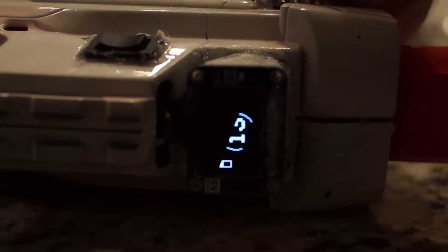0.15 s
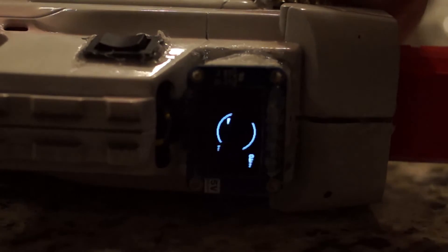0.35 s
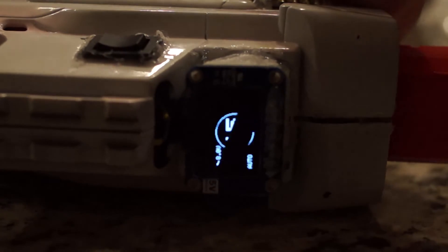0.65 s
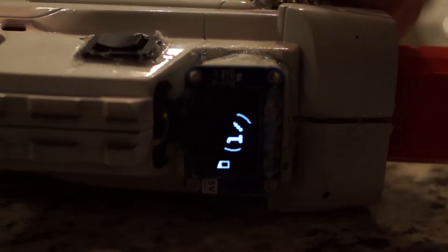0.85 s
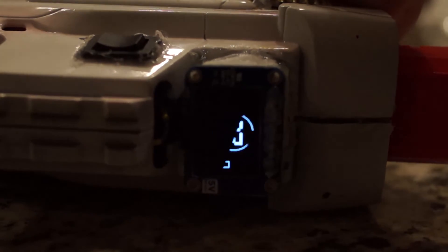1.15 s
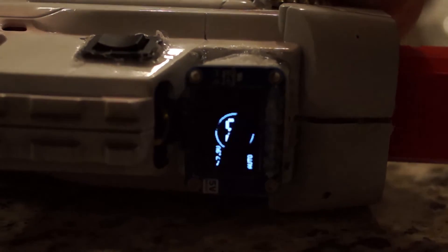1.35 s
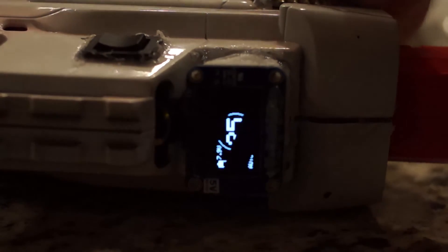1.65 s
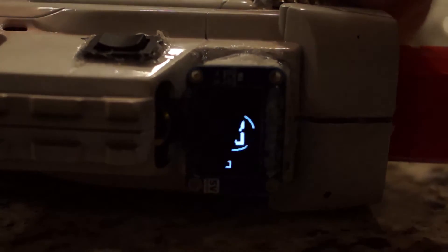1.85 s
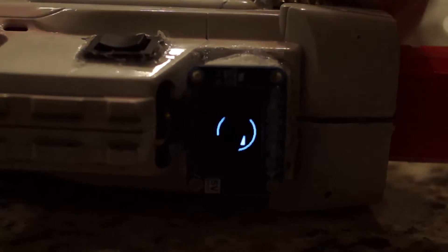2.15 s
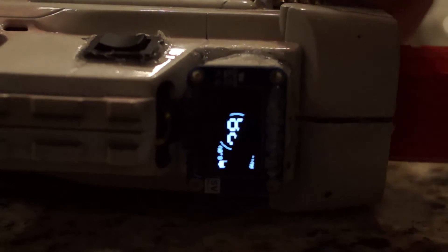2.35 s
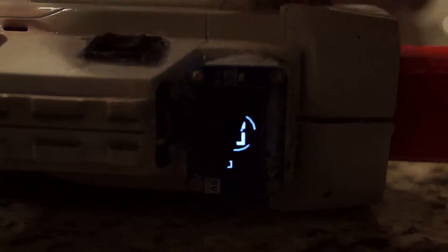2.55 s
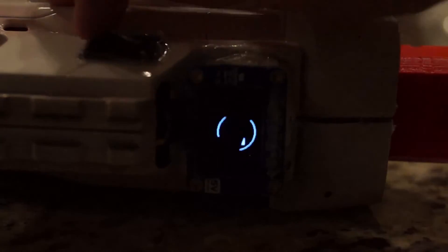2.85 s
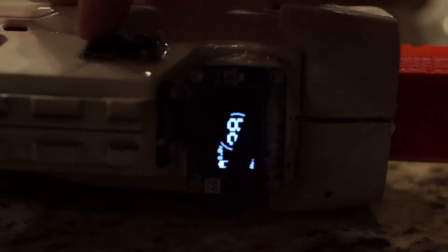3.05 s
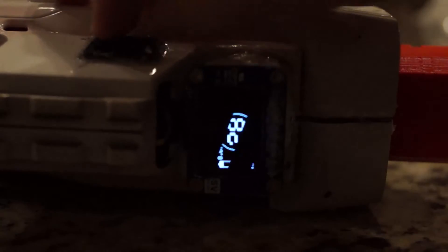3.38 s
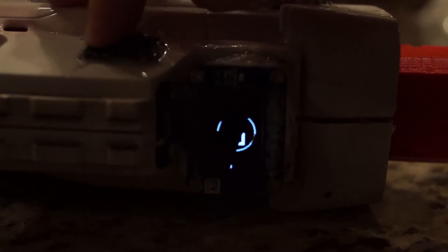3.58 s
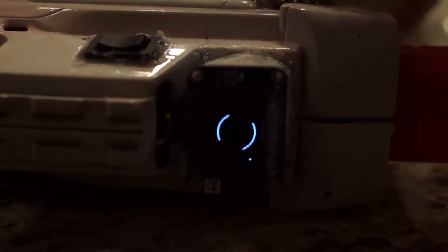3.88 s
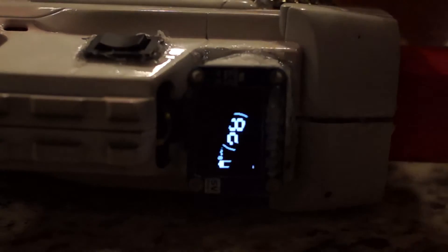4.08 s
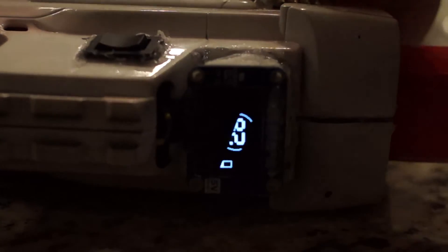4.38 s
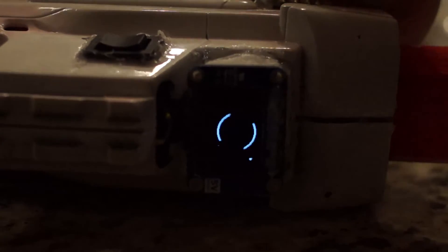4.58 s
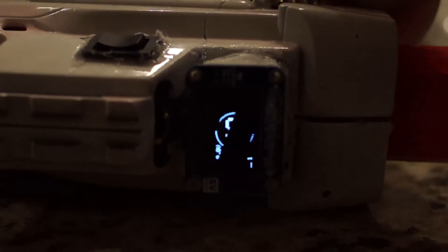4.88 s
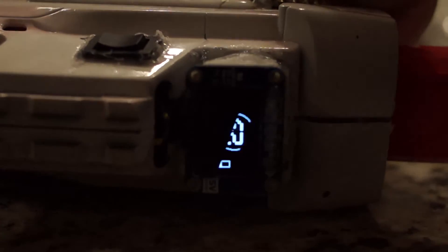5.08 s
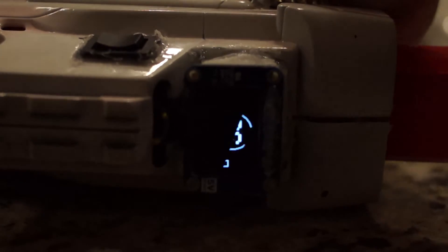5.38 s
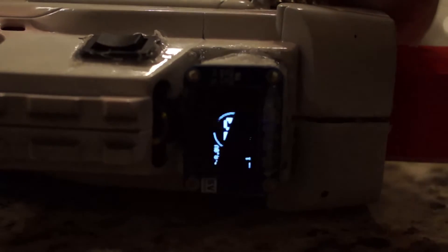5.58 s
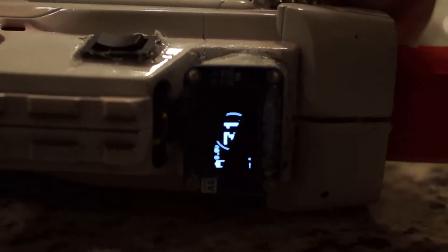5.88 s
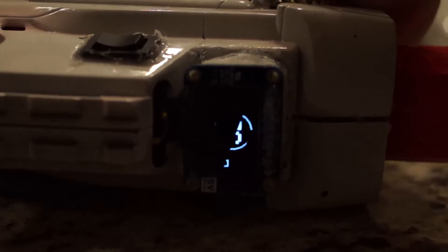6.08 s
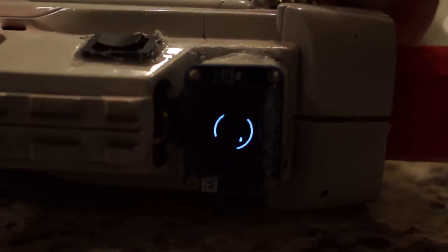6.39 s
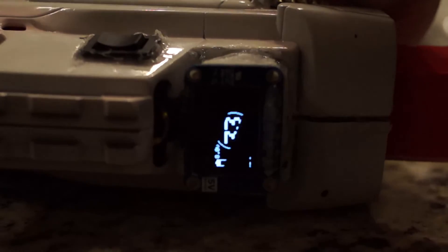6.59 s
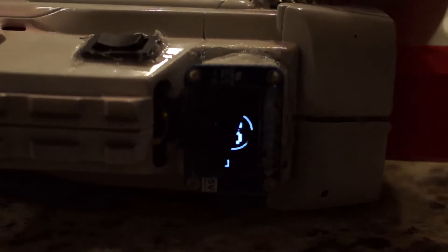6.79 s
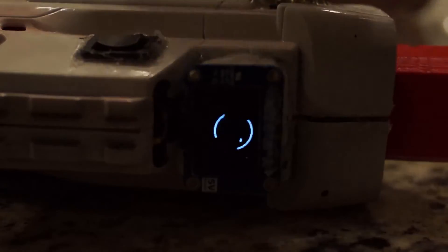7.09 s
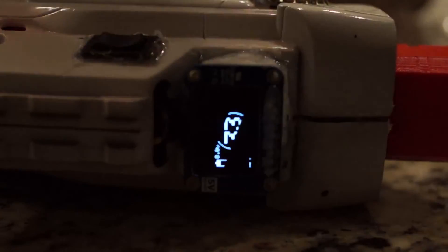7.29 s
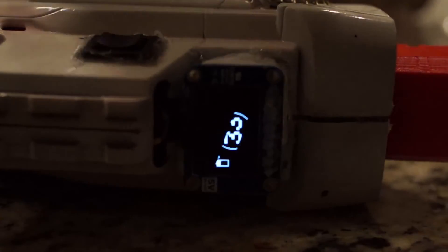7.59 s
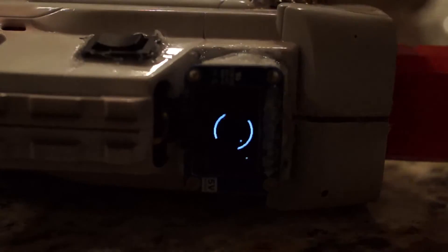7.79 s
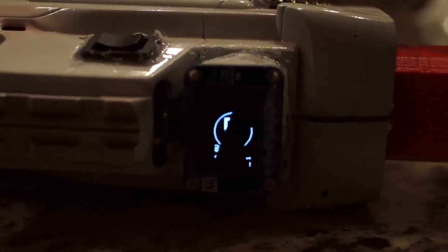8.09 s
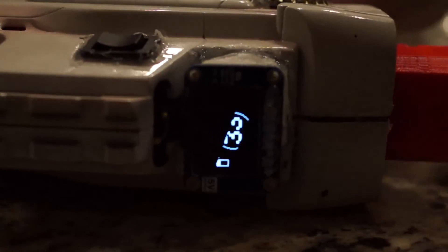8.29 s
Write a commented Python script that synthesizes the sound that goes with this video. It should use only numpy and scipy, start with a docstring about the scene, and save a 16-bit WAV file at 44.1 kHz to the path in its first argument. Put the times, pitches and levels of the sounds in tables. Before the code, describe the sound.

Close, rattling motor bursts from a plastic toy blaster, followed by handling clicks and five short, evenly spaced whirring shots.

```python
"""Toy dart blaster, fired empty

Close up in a small hard room: two bursts, then five single shots. The motor whines up to speed and
cranks a pusher through a gearbox; every stroke rattles the hollow plastic shell. The trigger creaks
and trips its switch before each run, buttons and fingers click, and the room hums faintly."""
import sys
import numpy as np
from scipy import signal
from scipy.fft import rfft, irfft, next_fast_len
from scipy.io import wavfile
from scipy.ndimage import map_coordinates

SR = 44100
rng = np.random.default_rng(int(sys.argv[2]) if len(sys.argv) > 2 else 0)


def inscribe(sig):
    """Save sig as 16-bit PCM at rate SR to the path in sys.argv[1].

    A 1-D sig is mono; a 2-D sig holds one channel per row.
    Samples are clipped to [-1, 1] before scaling.
    """
    pcm = np.round(np.clip(np.atleast_2d(sig).T, -1, 1) * 32767)
    wavfile.write(sys.argv[1], SR, pcm.astype(np.int16))


N = 372204
TIME = np.arange(N) / SR
FFT_SIZE = 2 * next_fast_len(N // 2 + SR // 2)
HZ = np.fft.rfftfreq(FFT_SIZE, 1 / SR)

# bursts and shots: (start [s], stop [s], full motor speed [rev/s], level [dB])
MOTOR_RUNS = [(.458, 1.669, 591, -1), (2.082, 2.384, 595, -0.5), (4.779, 4.883, 592, -0.5),
              (5.185, 5.284, 594, -0.5), (5.55, 5.652, 591, -1), (5.921, 6.021, 590, -0.5),
              (6.292, 6.395, 591, -0.5)]
# hits within one pusher stroke: (position [crank turns], thud [dB], clack [dB])
STROKE_HITS = [(0, -32, -15), (.075, -21, -23.5), (.125, -24, -24), (.19, -34.5, -28), (.275, -20, -21),
               (.33, -20, -27.5), (.38, -18.5, -30), (0.521, -26.5, -17), (0.584, -20, -22),
               (.655, -17.5, -33.5), (0.719, -27.5, -28.5), (.8, -24.5, -33)]
# partials of the whine: (multiple of the shaft speed, level [dB])
WHINE_PARTIALS = [(1, -29), (3, -33), (6, -27), (7, -47), (12, -55), (14, -43)]
# broad colour of the plastic shell: (frequency [Hz], gain [dB])
SHELL_EQ = [(30, -58), (120, -37), (200, -28), (420, -16), (620, -4), (1000, 0.16), (1750, 1.5),
            (2100, -6.5), (3000, -7.5), (4200, -8), (5500, -12), (7800, -16.5), (9000, -20), (11000, -22)]
# its resonances: (centre [Hz], width [Hz], boost [dB])
SHELL_PEAKS = [(527, 14, 4), (689, 63, 6), (797, 38, 5), (986, 105, 6), (1183, 76, 5.5), (1269, 22, 3.5),
               (1387, 7, 3.5), (1510, 64, 7), (1777, 12, 5), (2423, 220, 3.5), (2750, 160, 3),
               (2840, 270, 2.5), (3444, 130, 6.5), (4180, 130, 3), (8200, 160, 2)]
# the whole shell rocking on the counter: (frequency [Hz], level [dB], t60 before damping [s])
KNOCK_MODES = [(343, 2, 0.07), (565, -7, 0.19), (690, -4, 0.56), (727, -8.5, 0.35)]
# trigger pulls: (touch [s], switch trips [s], end [s], level [dB], touch accent [dB], slip accent [dB])
TRIGGER_PULLS = [(0.3113, .347, .407, -5.5, 5, 0), (1.953, 1.978, 2.042, -1.5, 0, 1),
                 (4.678, 4.703, 4.741, 2.5, -4, -2), (5.091, 5.118, 5.149, 1, -8, 0),
                 (5.441, 5.462, 5.509, 0, 3.5, -1.5), (5.8359, 5.859, 5.897, -1, 4, 1.5),
                 (6.195, 6.222, 6.266, -1.5, 7.5, 1)]
# each pull takes up slack, slips, trips the switch, slips again and bottoms out: (travel [0 touch,
# 1 switch, 2 end], knock [dB], body [dB], snap [dB], tick [dB], base t60 [s], ring [Hz])
TRIGGER_HITS = [(0, -50, -36, -45, -49, 0.038, 1620), (0.599, -62, -38, -48, -56, 0.047, 1725),
                (1, -61.5, -44, -41, -43, 0.045, 2640), (1.26, -52, -34, -45, -53, 0.041, 1510),
                (2, -56, -37, -46, -55, .038, 1780)]
# buttons and fingers: (time [s], snap [dB], body re snap [dB], tick re snap [dB], base t60 [s], ring [Hz])
FINGER_CLICKS = [(3.192, -54.5, -2.5, -18, 0.073, 1840), (3.344, -59, 8, -14, .05, 1830),
                 (3.401, -52, 8.5, -15, .036, 1680), (3.5856, -30, -11, -6.5, .021, 1760),
                 (3.7153, -34.5, -6, -2.5, .027, 1620), (4.1755, -34, 8.5, -6.5, 0.027, 1140),
                 (4.2037, -38, 8.5, -5, 0.083, 840), (8.128, -42.5, -8, -12, 0.07, 1680),
                 (8.2115, -29.5, -6, -9, 0.0084, 3300), (8.3208, -36, -3, -9, 0.02, 2210),
                 (8.397, -28.5, -8.5, -7.5, .03, 2070)]
# a click's body, snap and tick: (low edge [Hz], high edge [Hz], multiple of the base t60)
CLICK_BANDS = [(760, 1510, 1.33), (1540, 4750, 0.87), (4940, 9600, 0.92)]
# the grip shifts and the shell bumps the counter: (time [s], snap [dB], ring [Hz])
COUNTER_BUMPS = [(7.4248, -36.5, 784), (7.5686, -40.5, 2210), (7.5986, -49.5, 3030), (7.634, -44, 2740),
                 (7.655, -42.5, 2150)]
# a bump's layers, added to its level: (knock [dB], body [dB], snap [dB], tick [dB])
BUMP_MIX = (5, -2, 1, -15)
# the top switch springs back: (time [s], level [dB])
SWITCH_RELEASES = [(3.585, -54), (3.7125, -57)]
# its ringing metal: (frequency [Hz], level [dB], t60 [s])
SPRING_MODES = [(1770, -5, .1), (2875, -5, .17), (3470, -9, 0.15), (4100, -9, .2), (4745, -3, 0.12),
                (6040, -9, .2), (7700, -10, .14)]
# a hand slides over the plastic: (centre [s], half length [s], level [dB])
HAND_SLIDES = [(3.933, 0.071, -67), (7.728, 0.14, -60.5), (7.958, 0.045, -70), (8.3, 0.25, -59)]
# reverb decay: (frequency [Hz], t60 [s])
ROOM_DECAY = [(150, 0.66), (800, 0.39), (2000, 0.42), (5500, 0.41), (11000, 0.32)]
# colour of the room tone: (frequency [Hz], gain [dB])
AIR_EQ = [(15, -33), (25, -19.5), (59, -5), (92, -9.5), (107, -6), (160, -5.5), (192, -6.5), (241, -3.5),
          (401, -5.5), (492, -6.5), (840, -13), (1110, -15), (1360, -16), (1590, -20), (11000, -37.5),
          (14300, -76), (22000, -120)]
# appliance hum: (frequency [Hz], level [dB])
HUM_TONES = [(119.8, -63.5), (150.7, -65.5), (170, -62), (250, -69), (299, -70)]
# stereo width, opening towards the treble: (frequency [Hz], side gain [dB])
SIDE_EQ = [(100, -23.5), (300, -15.5), (700, -14.5), (1500, -6), (4000, -5), (10000, -3)]
# colour mismatch of the microphones: (frequency [Hz], left minus right [dB])
MIC_BALANCE = [(60, 1.5), (130, -0.5), (270, -0.5), (570, 2.5), (1210, 0.5), (2560, 0.5), (5430, -1.0),
               (11500, 0.5)]


def drive(spin_up_s=.022, brake_s=.018, strain_db=1, turns_per_stroke=60, rest_turn=.015):
    """The motor spins up and is braked: shaft speed [rev/s], crank position [turns] and force."""
    speed, crank, force = np.zeros((3, N))
    for start, stop, full_speed, db in MOTOR_RUNS:
        on = (TIME >= start) & (TIME < stop + .1)
        t = TIME[on]
        rise = 1 - np.exp(-(t - start) / spin_up_s)
        share = rise * np.exp(-np.maximum(t - stop, 0) / brake_s)
        speed[on] = full_speed * share
        crank[on] = rest_turn + np.cumsum(speed[on]) / SR / turns_per_stroke
        force[on] = amp(db + strain_db * (.5 - rise)) * share ** .5
    return speed, crank, force


def pusher_rattle(speed, crank, force, scatter_db=1.38, grind_db=-30, teeth_db=-35, crossover_hz=2200):
    """Loose parts collide at set crank angles and chatter in the shell; the gears grind in between."""
    thuds, clacks = np.zeros((2, N))
    turning = (crank[:-1] > 0) & (crank[1:] > 0)
    for turn, thud_db, clack_db in STROKE_HITS:
        hits = np.flatnonzero((np.diff(np.floor(crank - turn)) > 0) & turning)
        strength = force[hits, None] * amp(scatter_db * rng.standard_normal((len(hits), 2)))
        thuds[hits] += amp(thud_db) * strength[:, 0]
        clacks[hits] += amp(clack_db) * strength[:, 1]
    # the gears are loudest while they accelerate the pusher
    acceleration = np.maximum(np.gradient(speed), 0)
    strain = force * (acceleration / acceleration.max()) ** .5
    low = decay(thuds, t60=.043) + amp(grind_db) * force + amp(-22) * strain
    high = decay(clacks, t60=.05) + amp(teeth_db) * force + amp(-24) * strain * speed / speed.max()
    low *= chatter(rate=3000, smooth=.81)
    high *= chatter(rate=4000, smooth=.94)
    shell = shell_colour()
    low_share = 1 / (1 + (HZ / crossover_hz) ** 4)
    low_eq = causal(unit(shell * low_share ** .5))
    high_eq = causal(unit(shell * (1 - low_share) ** .5))
    return filtered(low, low_eq) + filtered(high, high_eq)


def shell_colour():
    """The hollow shell's gain curve: a broad EQ with cavity and panel resonances on top."""
    peaks_db = sum(db / (1 + (2 * (HZ - hz) / width) ** 2) for hz, width, db in SHELL_PEAKS)
    return amp(along(SHELL_EQ) + peaks_db)


def motor_whine(speed, crank, force, sag=.00095, flutter_db=1.1, commutator_multiple=3, surge_db=19.5,
                panel_hz=1620, panel_half_width_hz=95, panel_db=9):
    """Shaft imbalance and commutator tones radiate from the shell, sweeping a loose panel's resonance."""
    turns = np.cumsum(speed * (1 + sag * np.sin(2 * np.pi * crank) + .0007 * wobble(40))) / SR
    current = np.tanh((1 - speed / speed.max()) / .2)
    tones = np.zeros(N)
    for multiple, db in WHINE_PARTIALS:
        hz = multiple * speed
        boost_db = panel_db / (1 + ((hz - panel_hz) / panel_half_width_hz) ** 2)
        if multiple == commutator_multiple:  # swells with the current drawn below full speed
            boost_db += surge_db * current
        shell_db = np.minimum(along(SHELL_EQ, hz) - along(SHELL_EQ, hz.max()), 0)
        level = amp(db + boost_db + shell_db - flutter_db * wobble(45))
        tones += level * np.sin(2 * np.pi * multiple * turns)
    return tones * force * (speed / speed.max()) ** 2


def click_cues(finger_knock_db=-17, bump_t60=.074):
    """Trigger, finger and counter hits: (time [s], knock, body, snap, tick [dB], t60 [s], ring [Hz])."""
    cues = []
    for *times, db, touch_db, slip_db in TRIGGER_PULLS:
        accents_db = db + np.array([touch_db, slip_db, 0, slip_db, slip_db])
        for (travel, *levels, t60, ring_hz), accent_db in zip(TRIGGER_HITS, accents_db):
            start = np.interp(travel, [0, 1, 2], times)
            cues.append((start, *np.add(levels, accent_db), t60, ring_hz))
    for start, db, body_db, tick_db, t60, ring_hz in FINGER_CLICKS:
        cues.append((start, db + finger_knock_db, db + body_db, db, db + tick_db, t60, ring_hz))
    for start, db, ring_hz in COUNTER_BUMPS:
        cues.append((start, *np.add(BUMP_MIX, db), bump_t60, ring_hz))
    return cues


def plastic_clicks(trim_db=-.5, knock_trim_db=-3, ring_db=-2, attack_s=.00018):
    """Each contact is a dry snap in three noise bands, a brief ring and a hollow knock of the shell."""
    t = np.arange(SR // 5) / SR
    tracks, rings = np.zeros((len(CLICK_BANDS), N + SR)), np.zeros(N + SR)
    t60_scales = np.array(CLICK_BANDS)[:, 2:]
    for start, knock_db, body_db, snap_db, tick_db, t60, ring_hz in click_cues():
        span = round(start * SR) + np.arange(len(t))
        envelopes = amp(trim_db - 60 * t / (t60 * t60_scales)) * (1 - np.exp(-t / attack_s))
        bursts = envelopes * rng.standard_normal(envelopes.shape)
        tracks[:, span] += amp([[body_db], [snap_db], [tick_db]]) * bursts
        ring = amp(snap_db + ring_db) * envelopes[0] * np.sin(2 * np.pi * ring_hz * t)
        knock = amp(knock_db + knock_trim_db) * struck(KNOCK_MODES, t) * np.exp(-2 * t / t60)
        rings[span] += ring + knock
    snaps = sum(filtered(track[:N], plastic_band(lo, hi))
                for track, (lo, hi, _) in zip(tracks, CLICK_BANDS))
    return snaps + rings[:N]


def plastic_band(low_hz, high_hz, tilt_hz=2500):
    """One band of the plastic's response, duller towards the treble."""
    skirts = (1 + (low_hz / (HZ + 1)) ** 10) * (1 + (HZ / high_hz) ** 10)
    tilt = 1 + (HZ / tilt_hz) ** 2
    return causal(unit(1 / np.sqrt(skirts * tilt)))


def switch_spring():
    """Each release sets the metal of the top switch ringing faintly."""
    t, pings = np.arange(SR // 4) / SR, np.zeros(N + SR)
    for start, db in SWITCH_RELEASES:
        pings[round(start * SR):][:len(t)] += amp(db) * struck(SPRING_MODES, t)
    return pings[:N]


def rubbing(lead_s=.07, half_length_s=.057, trigger_db=-51):
    """The trigger creaks along its slot just before each run; now and then a hand brushes the shell."""
    pulls = sum(np.exp(-((TIME - start + lead_s) / half_length_s) ** 2) for start, *_ in MOTOR_RUNS)
    slides = sum(amp(db) * np.exp(-((TIME - centre) / half) ** 2) for centre, half, db in HAND_SLIDES)
    creak = filtered(amp(trigger_db) * pulls * chatter(rate=980, smooth=.39), plastic_band(760, 1480))
    brush = filtered(slides * chatter(rate=900, smooth=.82), plastic_band(640, 7600))
    return creak + brush


def counter_scatter(x, t60=.08, build_s=.002):
    """Early reflections off the counter top and nearby things."""
    t = np.arange(SR // 12) / SR
    scatter = rng.standard_normal(len(t)) * amp(-60 * t / t60) * (1 - np.exp(-t / build_s))
    return signal.fftconvolve(x, scatter / np.linalg.norm(scatter))[:N]


def room_reverb(x, build_s=.0065):
    """The walls' diffuse tail as mid and side; each frequency dies at its own rate."""
    hz, t, spectrum = signal.stft(rng.standard_normal((2, SR // 2)), SR, nperseg=256)
    spectrum *= amp(-60 * t / along(ROOM_DECAY, hz)[:, None])
    tail = signal.istft(spectrum, SR, nperseg=256)[1]
    tail *= 1 - np.exp(-(np.arange(tail.shape[1]) / SR / build_s) ** 2)
    return signal.fftconvolve(x[None], tail / np.linalg.norm(tail[0]), axes=1)[:, :N]


def room_tone(air_db=-52.5, echo_db=-45, echo_t60=.45):
    """Air and wavering appliance hum as mid and side, opening on the dying echo of an earlier burst."""
    air = amp(air_db) * unit(filtered(rng.standard_normal((2, N)), amp(along(AIR_EQ))))
    echo = unit(filtered(rng.standard_normal((2, N)), shell_colour()))
    mid, side = air + amp(echo_db - 60 * TIME / echo_t60) * echo
    for hz, db in HUM_TONES:
        level = amp(db + 2.2 * wobble(4)) * np.sqrt(2)
        mid += level * np.sin(2 * np.pi * hz * TIME + .5 * wobble(4))
    return mid, filtered(side, amp(along(SIDE_EQ) - .5))


def struck(modes, t, scatter_db=2):
    """Decaying sine modes, balanced a little differently on every hit."""
    return sum(amp(db + rng.normal(0, scatter_db) - 60 * t / t60) * np.sin(2 * np.pi * hz * t)
               for hz, db, t60 in modes)


def chatter(rate, smooth):
    """Tiny random impacts, rate a second, over a share of smooth rubbing."""
    impacts = rng.standard_normal(N) * (rng.random(N) < rate / SR)
    return unit(unit(impacts) + smooth * rng.standard_normal(N))


def wobble(rate):
    """Smooth random modulation, rate points a second."""
    return map_coordinates(rng.standard_normal(int(N * rate / SR) + 4), [TIME * rate / SR], order=2)


def decay(hits, t60):
    """Give every hit an exponential tail."""
    return signal.lfilter([1], [1, -np.exp(-np.log(1000) / (t60 * SR))], hits)


def causal(gain):
    """The minimum-phase response with this gain: it rings only after a hit."""
    cepstrum = irfft(np.log(np.maximum(gain, 1e-6)))
    cepstrum[1:FFT_SIZE // 2] *= 2
    cepstrum[FFT_SIZE // 2 + 1:] = 0
    return np.exp(rfft(cepstrum))


def filtered(x, response):
    """x through a frequency response."""
    return irfft(rfft(x, FFT_SIZE) * response, FFT_SIZE)[..., :N]


def along(points, hz=HZ):
    """A curve through (frequency [Hz], value) points on a log frequency axis."""
    frequencies, values = np.transpose(points)
    return np.interp(np.log(hz + 1), np.log(frequencies), values)


def amp(db):
    """Decibels to gain."""
    return 10 ** (np.asarray(db) / 20)


def unit(x):
    """Scale to rms 1."""
    return x / np.sqrt(np.mean(np.abs(x) ** 2) + 1e-20)


def scene(rattle_send_db=-7.5, whine_send_db=-22, handling_send_db=-11, side_db=-6):
    """The blaster dead centre, with the counter and the walls giving it width."""
    speed, crank, force = drive()
    rattle = pusher_rattle(speed, crank, force)
    handling = plastic_clicks() + switch_spring() + rubbing()
    whine = motor_whine(speed, crank, force)
    send = amp(rattle_send_db) * rattle + amp(whine_send_db) * whine + amp(handling_send_db) * handling
    reverb_mid, reverb_side = room_reverb(send)
    tone_mid, tone_side = room_tone()
    scatter = filtered(counter_scatter(rattle + handling), amp(along(SIDE_EQ)))
    mid = rattle + whine + handling + reverb_mid + tone_mid
    side = amp(side_db) * (scatter + reverb_side) + tone_side
    return np.array([mid + side, mid - side])


def record(dry, ceiling=.55, top_hz=11250):
    """Two microphones of slightly different colour, a soft clip and a steep high cut."""
    coloured = filtered(dry, amp(np.outer([.5, -.5], along(MIC_BALANCE))))
    rounded = coloured / (1 + (coloured / ceiling) ** 4) ** (1 / 4)
    return filtered(rounded, np.clip((top_hz - HZ) / 200, 0, 1))


dry = scene()
out = record(dry)
inscribe(out)
```